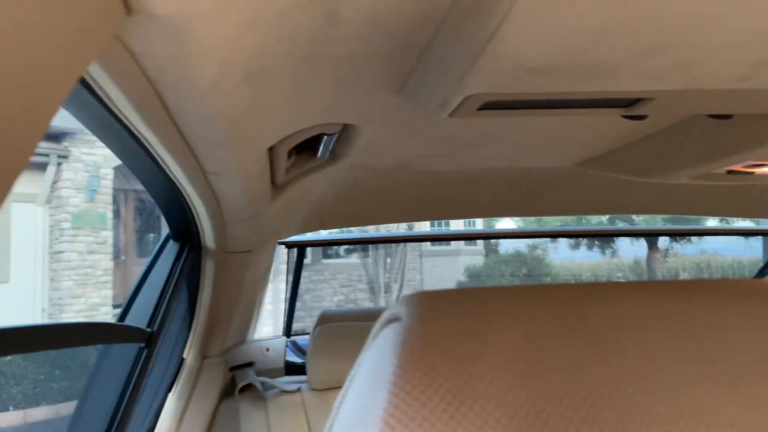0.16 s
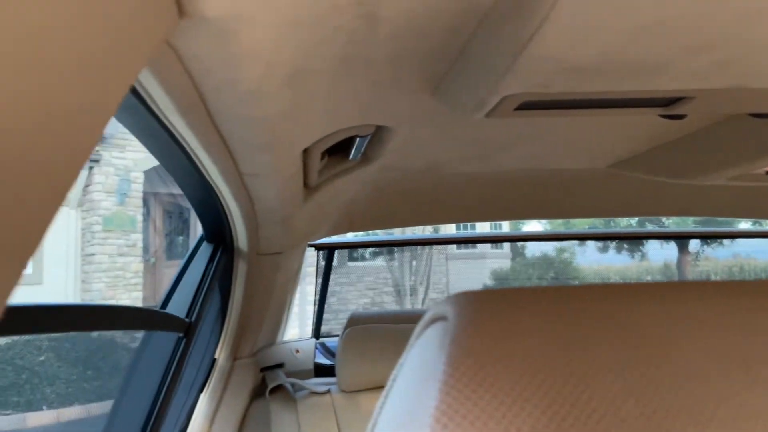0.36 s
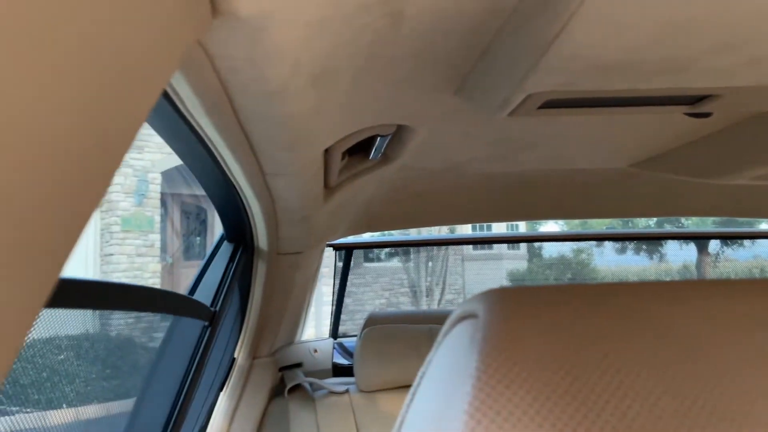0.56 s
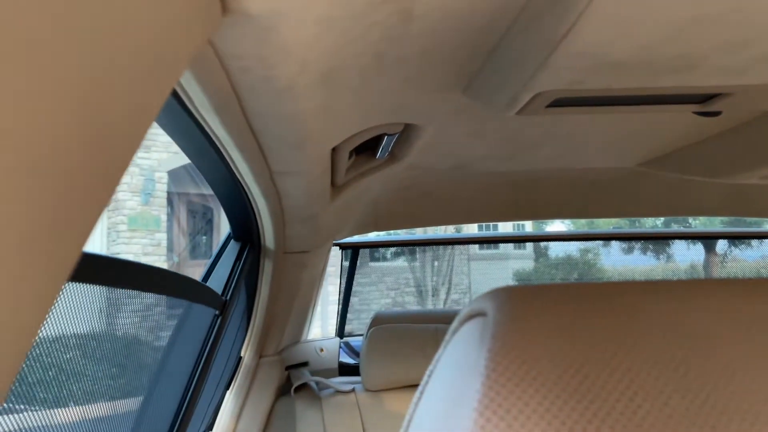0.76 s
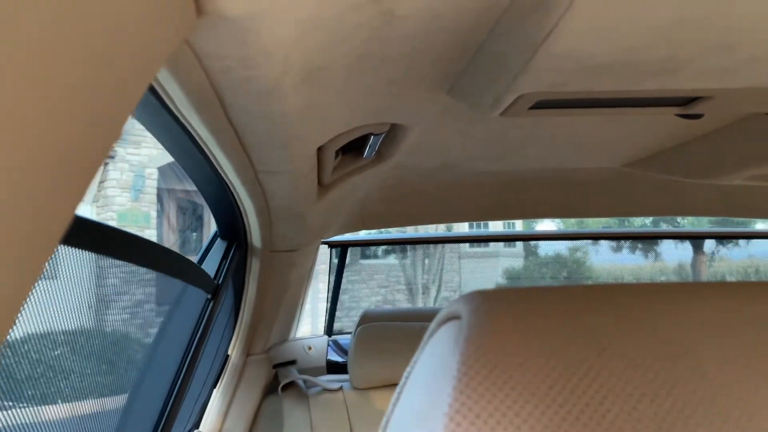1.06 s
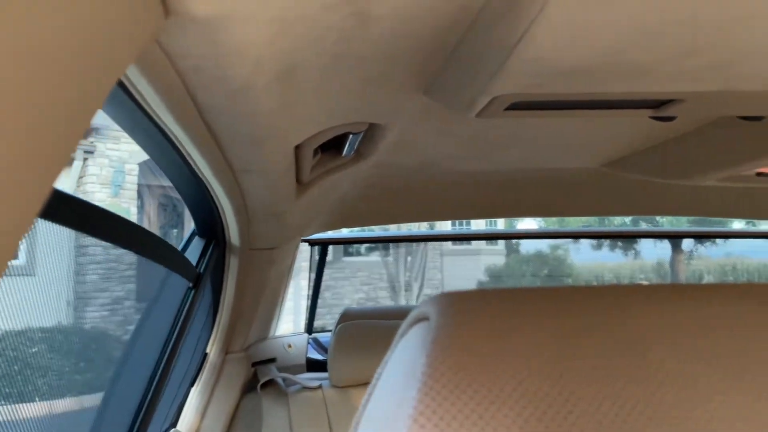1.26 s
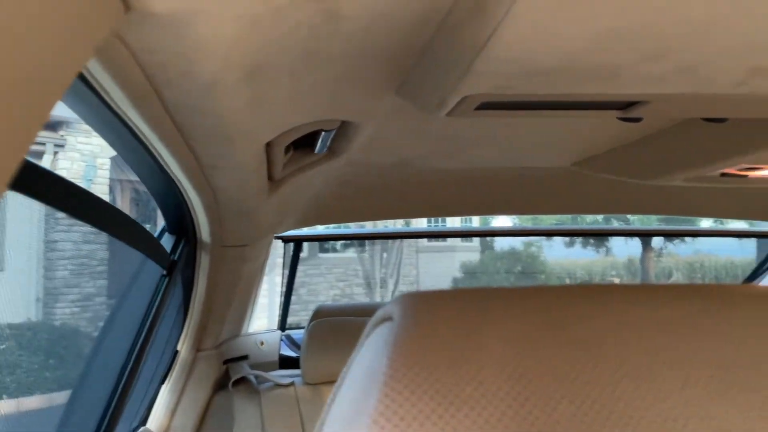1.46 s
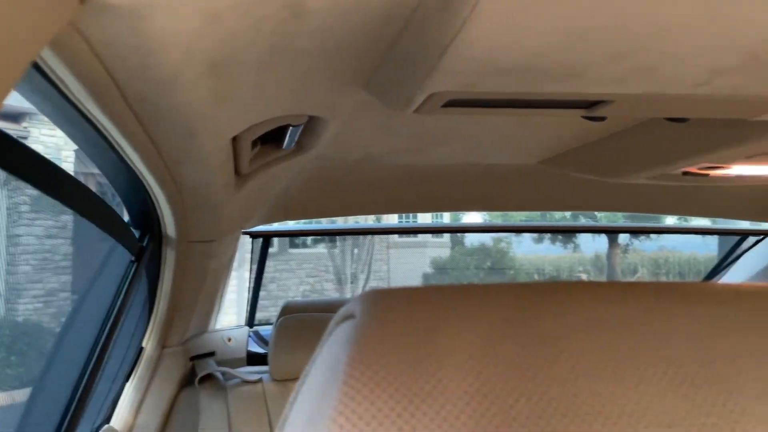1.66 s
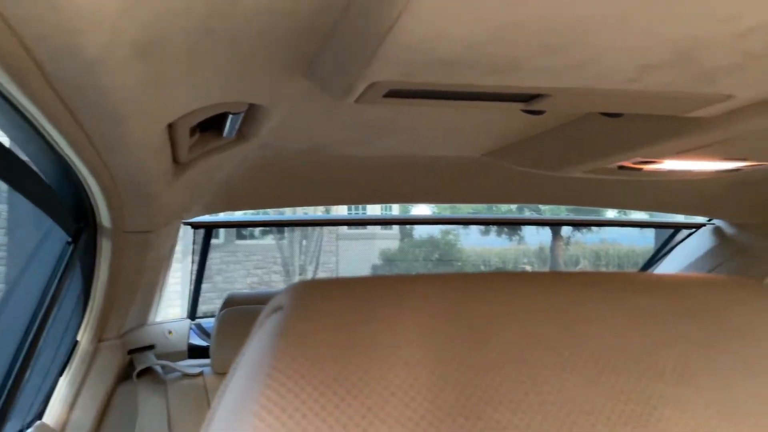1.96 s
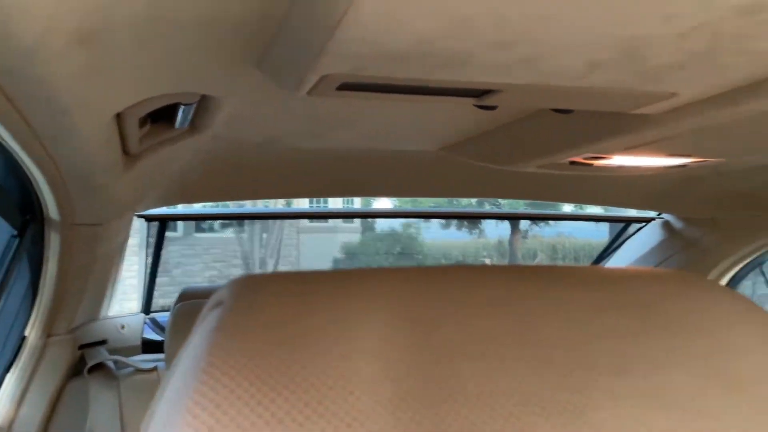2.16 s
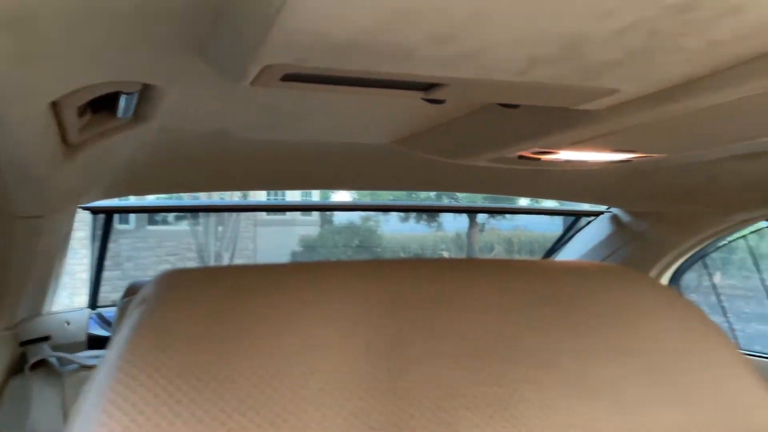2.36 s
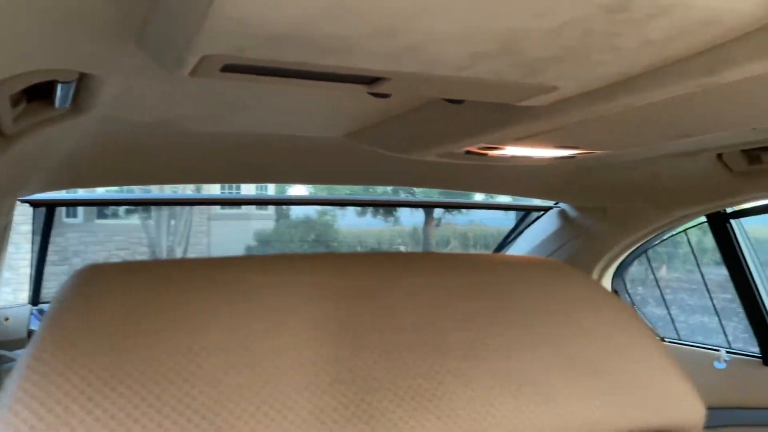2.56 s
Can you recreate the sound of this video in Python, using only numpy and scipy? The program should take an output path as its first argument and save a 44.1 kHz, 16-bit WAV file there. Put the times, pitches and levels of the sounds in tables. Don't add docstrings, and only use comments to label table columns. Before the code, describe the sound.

Motorized car sunshades hum and buzz shut, ending in soft knocks and sharp clicks over engine rumble

```python
import sys
import numpy as np
from scipy import signal
from scipy.fft import rfft, irfft, next_fast_len
from scipy.io import wavfile
from scipy.ndimage import map_coordinates

SR = 44100
rng = np.random.default_rng(int(sys.argv[2]) if len(sys.argv) > 2 else 0)


def linear_from_db(decibels):
    return 10 ** (np.asarray(decibels, float) / 20)


def store_pcm(level_fs):
    pcm = np.round(np.clip(level_fs, -1, 1) * 32767).astype(np.int16)
    wavfile.write(sys.argv[1], SR, np.atleast_2d(pcm).T)


N = 119070
T = np.arange(N) / SR

# f/Hz, density/dB per Hz
RUMBLE_SPECTRUM = [(20, -78.5), (35, -66), (70, -53.5), (150, -63.5), (240, -67.5), (400, -74),
                   (600, -89.5), (900, -120)]
VENT_SPECTRUM = [(300, -100), (600, -88), (1250, -86.5), (2200, -97), (4000, -102), (7500, -119),
                 (15600, -126), (16000, -145)]
# f/Hz, correlation
RUMBLE_LIKENESS = [(50, 0.73), (200, 0.7), (400, 0.58), (600, .1)]
VENT_LIKENESS = [(600, -.4), (1200, 0.012), (4000, 0.01), (8500, -1.4), (12500, .9)]

# t/s, firing rate/Hz
FIRING_RATE = [(0.0, 71.95), (0.3, 72.89), (0.6, 72.43), (0.9, 72.19), (1.2, 72.37), (1.5, 72.77),
               (1.8, 72.77), (2.1, 72.11), (2.4, 71.51), (2.7, 72.6)]
# multiple of the engine cycle, left peak level/dB, left over right/dB
CABIN_BOOM = [(6, -50, 0), (8, -49, -2), (9, -43, -4), (10, -47, 0), (11, -48, -2), (12, -18, 1),
              (13, -39, 1), (14, -34, 0), (15, -28, 1), (16, -45, 0), (17, -52, -1), (18, -40, 1),
              (19, -52, -1), (20, -39, -2), (21, -41, -3), (22, -41, -2), (23, -39, 7), (24, -25, 5),
              (25, -45, 5), (26, -36, 3), (27, -48, 0), (28, -57, -1), (33, -48, 2), (34, -51, -2),
              (45, -56, 2)]

# t/s, f/Hz
WHINE_PITCH = [(0, 541), (.5, 540), (1.2, 542), (1.42, 539), (1.6, 548), (1.8, 553), (1.9, 552),
               (2.05, 550)]
BEAT_NULLS = [-.02, .062, .141, .214, .292, .504, .611, .685, .77, .865, 1.004, 1.073, 1.142, 1.276, 1.408,
              1.534, 1.595, 1.685, 1.769, 1.9, 2.05]
# stop t/s, whine level/dB, gear noise level/dB, brush hiss level/dB
BLIND_MOTORS = [
    (1.87, -49.5, -3, -3.5),
    (1.982, -50, -3, -4),
]
# f/Hz, density/dB per Hz
GEAR_SPECTRUM = [(180, -87), (330, -74), (480, -78), (900, -86), (1700, -93.5), (3200, -96.5), (5500, -103),
                 (7000, -115)]
BRUSH_SPECTRUM = [(3500, -120), (5600, -105), (7000, -99), (9200, -101), (12000, -108.5), (14200, -106),
                  (15700, -108), (15950, -140)]
BRUSH_PEAK_SPECTRUM = [(5800, -125), (6500, -104), (7200, -103), (7700, -125)]
# f/Hz, correlation
GEAR_LIKENESS = [(300, .7), (500, .6), (750, -.35), (1600, -.2), (2600, .3), (5000, .1)]
# f/Hz, right lead/rad
PORT_PHASE = [(4500, -.3), (6500, 1.2), (7500, 2.3), (7900, 3.08), (9400, 3.2), (9900, 4.1), (11400, 4.8),
              (12500, 6.28)]

# t/s, thud level/dB, click level/dB, click top over body/dB, decay t60/s
CONTACTS = [(1.8377, -34.5, -55.5, -14.5, 0.04), (1.8445, -32.5, -49.5, -20.5, 0.033),
            (1.857, -41.5, -38, -19, 0.043), (1.8885, -42.5, -45, -8, 0.036), (1.982, -46.5, -54, -13, .04),
            (2.016, -44.5, -39, -5, 0.036), (2.028, -43, -53.5, -6.5, 0.1),
            (2.0759, -50.5, -25, 2.5, 0.022), (2.0786, -32, -31, -1.5, 0.036),
            (2.0897, -39, -44.5, -7, .045), (2.1723, -50.5, -44.5, -7, .05), (2.188, -42, -62, -10, 0.033)]
# f/Hz, width/Hz, level/dB
PANEL_MODES = [(278, 64, 3), (403, 78, 5.5), (597, 135, -1.5), (776, 340, -7), (1150, 260, -12.5),
               (2090, 180, -23.5)]
# f/Hz, density/dB per Hz
CLICK_BODY = [(600, -7.5), (1900, 1.5), (3400, -4.5), (4800, -6.5), (6500, -14), (8000, -40)]
CLICK_TOP = [(5000, -38), (7000, -11.5), (9200, -3), (11500, -12.5), (14500, -9), (15900, -9.5),
             (16500, -21.5)]


def along(points, hz):
    f, v = np.transpose(points)
    return np.interp(np.log(hz + 1), np.log(f + 1), v)


def turns(rate):
    return 2 * np.pi * np.cumsum(rate) / SR


def wobble(rate):
    knots = rng.standard_normal(int(N * rate / SR) + 4)
    return map_coordinates(knots, [T * rate])


def filtered(x, response):
    m = next_fast_len(N + SR // 2)
    return irfft(rfft(x, m) * response(np.fft.rfftfreq(m, 1 / SR)), m)[..., :N]


def rush(spectrum, likeness, ports=False):
    def mid_side(hz):
        angle = np.arccos(np.clip(along(likeness, hz), -1, 1)) / 2
        return linear_from_db(along(spectrum, hz)) * [np.cos(angle), np.sin(angle)]

    def gap(hz):
        return np.exp(np.outer([-.5j, .5j], along(PORT_PHASE, hz) * ports))

    white = rng.standard_normal((2, N)) * np.sqrt(SR / 2)
    mid, side = filtered(white, mid_side)
    return filtered(np.array([mid + side, mid - side]), gap)


def air():
    rumble = linear_from_db(.8 * wobble(6)) * rush(RUMBLE_SPECTRUM, RUMBLE_LIKENESS)
    vents = linear_from_db(0.66 * wobble(4)) * rush(VENT_SPECTRUM, VENT_LIKENESS)
    return rumble + vents


def accessories():
    poles_per_firing, poles_per_turn = 17.53, 36
    wander_hz, wander_db = 2.5, 1.3
    firing = np.interp(T, *np.transpose(FIRING_RATE))
    poles = turns(firing * poles_per_firing + wander_hz * wobble(12))
    belt = 1 + .55 * np.cos(poles / poles_per_turn)
    alternator = linear_from_db(-57.5 + wander_db * wobble(18)) * belt * np.sin(poles + [[.3], [-.3]])
    pump_phase = turns(2102 + 2 * wander_hz * wobble(6.8))
    pump = linear_from_db(-73 + 2 * wander_db * wobble(12)) * np.sin(pump_phase)
    return alternator * linear_from_db([[-.7], [.7]]) + pump * linear_from_db([[-1.5], [1.5]])


def engine():
    cylinders = 12
    paths_from = (11, 24)
    cycle_at_start = (.0915, .1098, .022)
    pulse_skew = (.2655, .554, -2.055)
    left_lead = np.array([[.5], [-.5]]) * .33
    boom_db, unsteady_db = 0.18, 1.02
    cycle = turns(np.interp(T, *np.transpose(FIRING_RATE))) / cylinders
    out = 0
    for k, db, pan_db in CABIN_BOOM:
        path = sum(k >= first for first in paths_from)
        shaky = .3 if k % cylinders == 0 else 1.5
        level = boom_db + db - np.array([[0], [pan_db]]) + unsteady_db * shaky * wobble(5.03)
        phase = k * (cycle + 2 * np.pi * cycle_at_start[path]) + pulse_skew[path]
        out = out + linear_from_db(level) * np.cos(phase + left_lead + 0.57 * shaky * wobble(3))
    return out


def blinds():
    run_down_s, whine_left_db, strain_db = 0.034, 7, 1
    whine_pan = linear_from_db([[whine_left_db / 2], [-whine_left_db / 2]])
    mean = turns(np.interp(T, *np.transpose(WHINE_PITCH)))
    slip = 2 * np.pi * (np.interp(T, BEAT_NULLS, np.arange(len(BEAT_NULLS))) + .5)
    out = 0
    for (stop, whine_db, gear_db, hiss_db), sign in zip(BLIND_MOTORS, (.5, -.5)):
        running = np.exp(-np.clip(T - stop, 0, None) / run_down_s)
        tone = linear_from_db(whine_db + 2.0 * wobble(7)) * np.sin(mean + sign * slip + [[.2], [-.2]]) * whine_pan
        gears = linear_from_db(gear_db + strain_db * wobble(9.8)) * rush(GEAR_SPECTRUM, GEAR_LIKENESS)
        gears = gears * linear_from_db([[.8], [-.8]])
        hiss = linear_from_db(hiss_db + .7 * wobble(6)) * rush(BRUSH_SPECTRUM, [(9000, .996)], ports=True)
        out = out + running * (tone * running ** -.75 + gears + hiss * running ** 3)
    brush_peak = linear_from_db(1.7 * T + 1.3 * wobble(5.7)) * rush(BRUSH_PEAK_SPECTRUM, [(7000, 0.67)], ports=True)
    return out + brush_peak * running ** 5


def panel(f):
    out = 0
    for k, (centre, width, db) in enumerate(PANEL_MODES):
        damping = 1j * f * width
        out = out + (-1) ** k * linear_from_db(db + 20.5) * damping / (centre * centre - f * f + damping)
    return out


def knocks():
    shake, body, top = np.zeros((2, N)), np.zeros(N), np.zeros(N)
    for s, thud_db, click_db, top_db, t60 in CONTACTS:
        age = np.clip(T - s, 0, 1)
        fall = (T >= s) * linear_from_db(-60 * age / t60) * (1 - np.exp(-age / 0.0002))
        push = rng.standard_normal((3, N))
        shake += linear_from_db(thud_db) * fall * (push[0] + .5 * push[1:])
        body += linear_from_db(click_db) * fall
        top += linear_from_db(click_db + top_db) * fall
    likeness = [(3000, .9)]
    clicks = body * rush(CLICK_BODY, likeness, ports=True) + top * rush(CLICK_TOP, likeness, ports=True)
    thuds = filtered(shake, panel) * linear_from_db([[1], [-1]])
    return thuds + linear_from_db(-43.5) * clicks


def scene():
    return air() + accessories() + engine() + blinds() + knocks()


def low_pass(x):
    return signal.sosfilt(signal.butter(12, 16470, fs=SR, output="sos"), x)


def record(dry):
    top_hz, stereo_top_hz = 16480, 11900
    mid = filtered(dry[0] + dry[1], lambda hz: hz < top_hz) / 2
    side = filtered(dry[0] - dry[1], lambda hz: hz < stereo_top_hz) / 2
    return low_pass(np.array([mid + side, mid - side]))


dry = scene()
out = record(dry)
store_pcm(out)
```